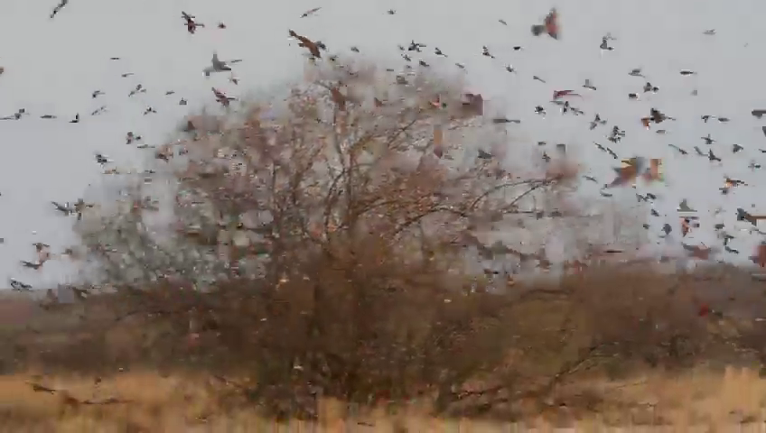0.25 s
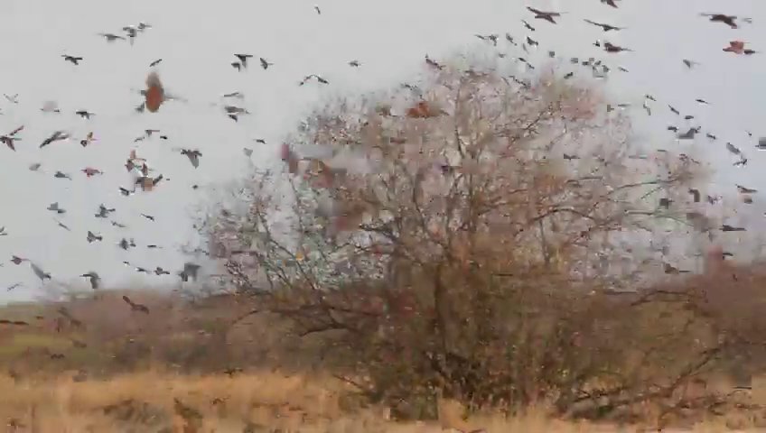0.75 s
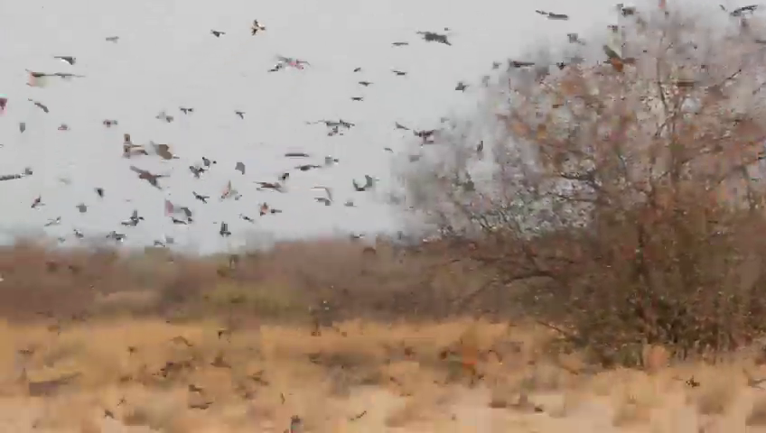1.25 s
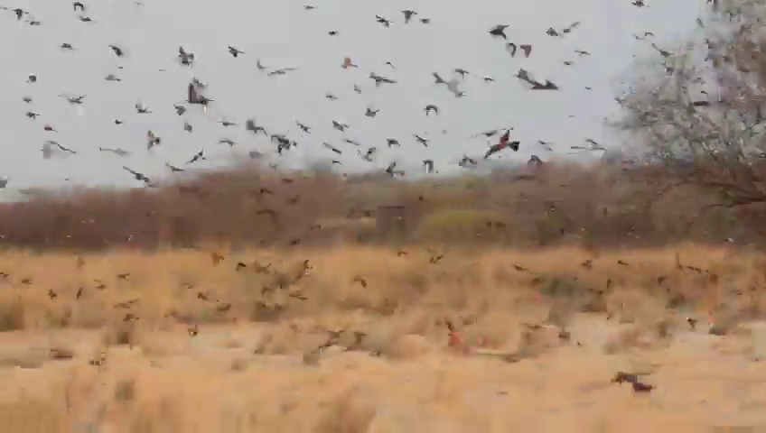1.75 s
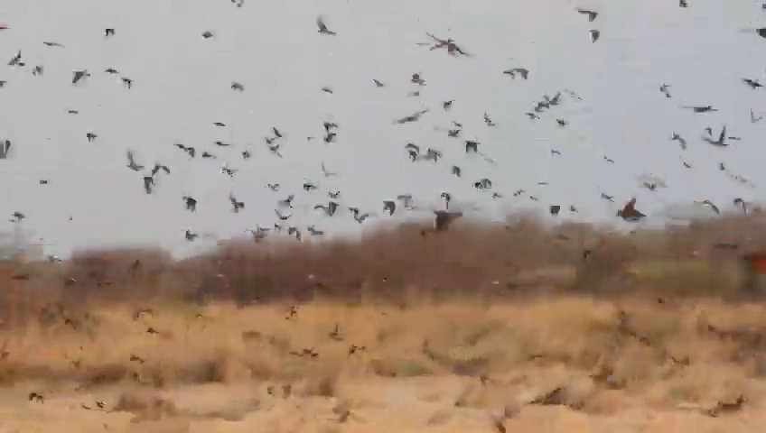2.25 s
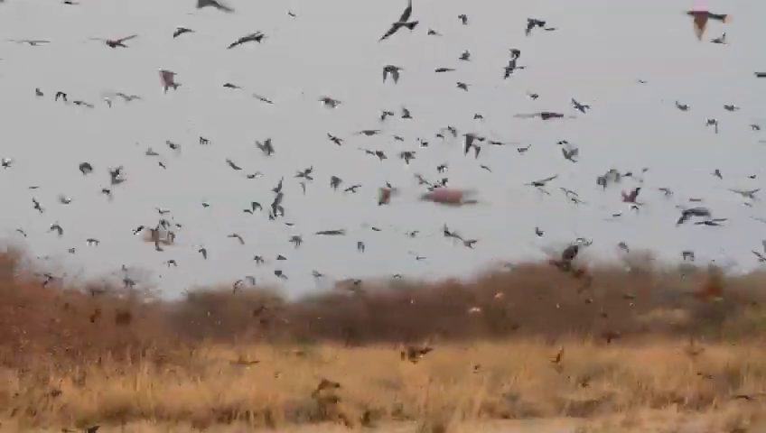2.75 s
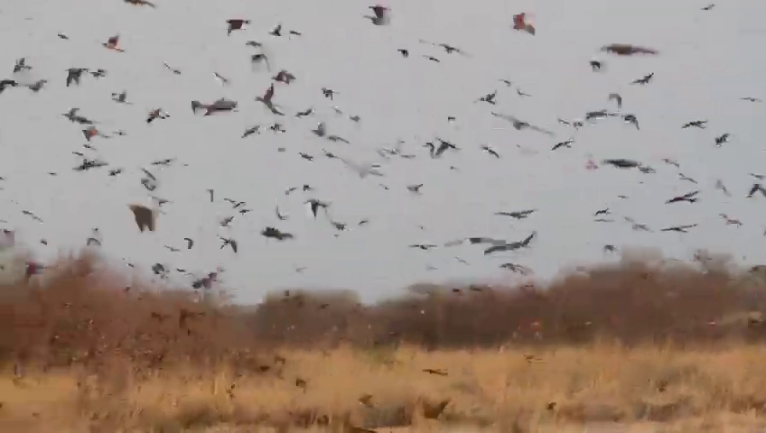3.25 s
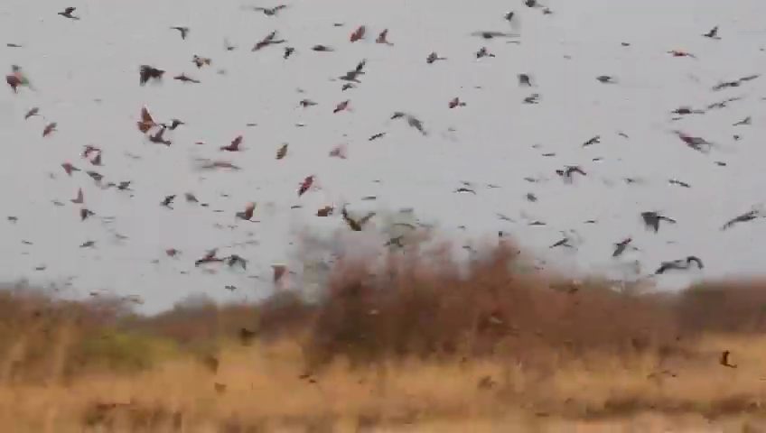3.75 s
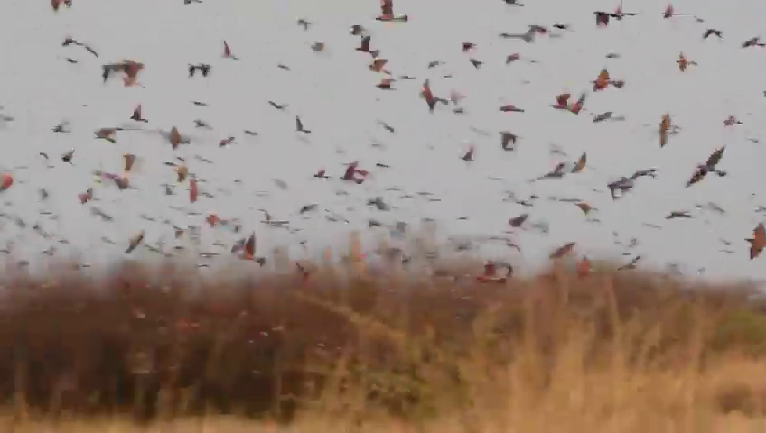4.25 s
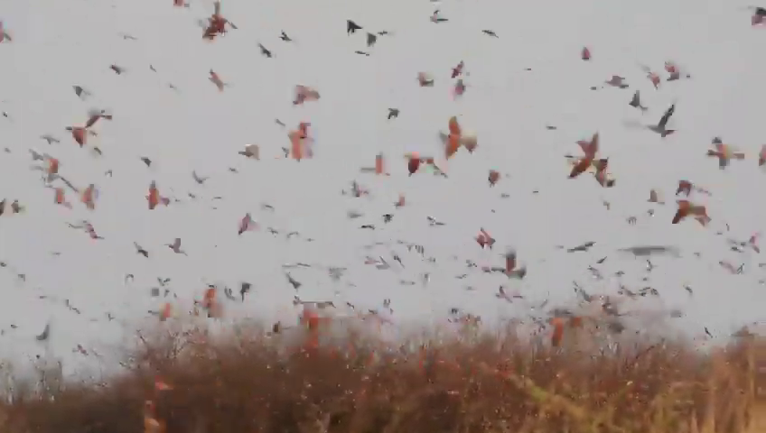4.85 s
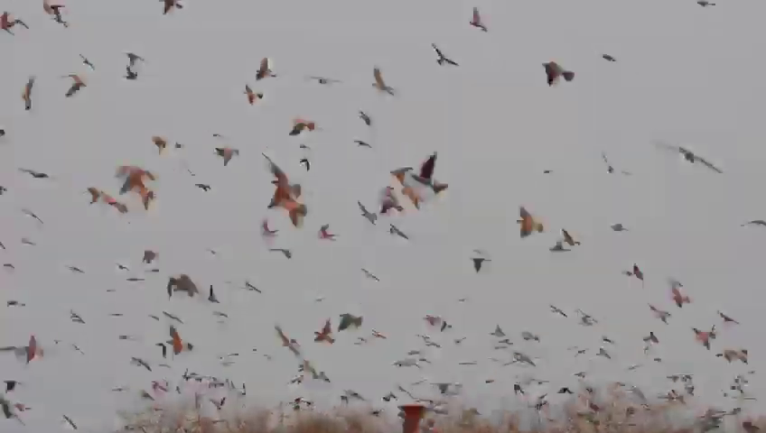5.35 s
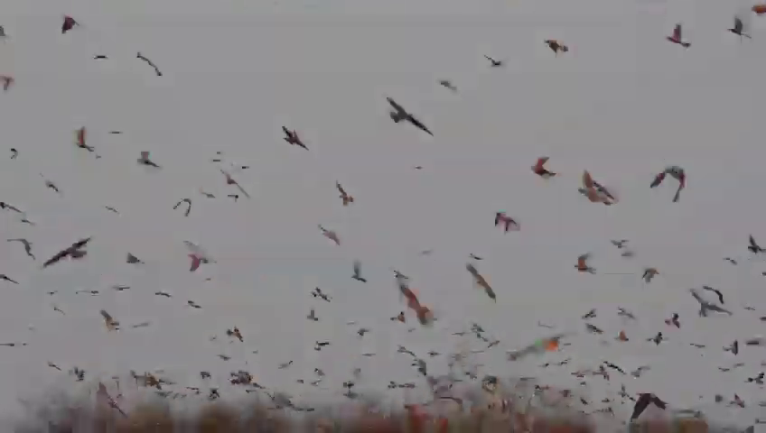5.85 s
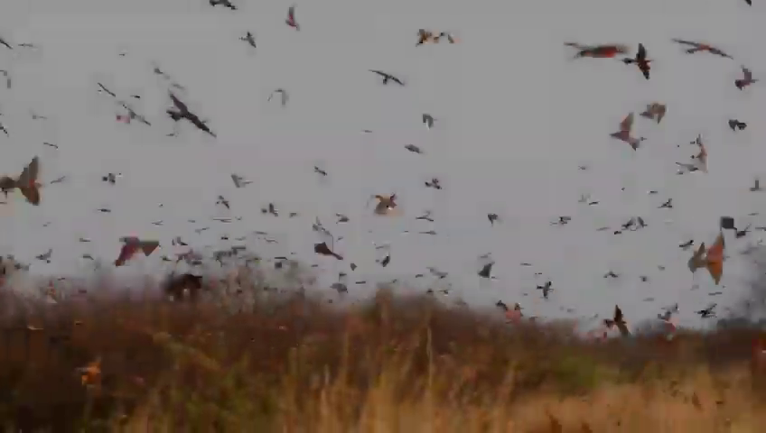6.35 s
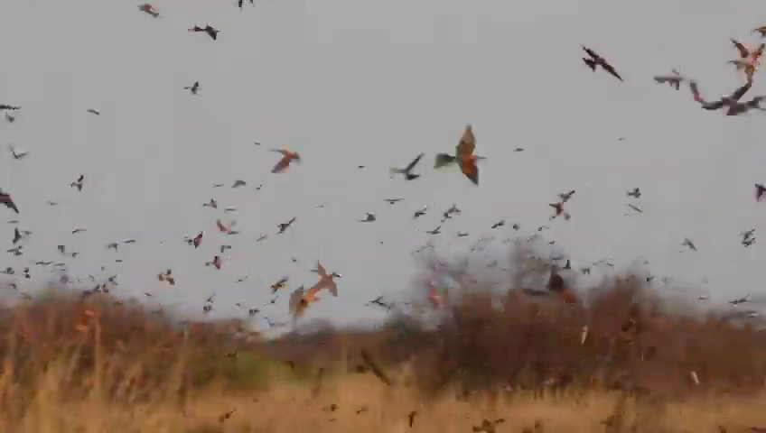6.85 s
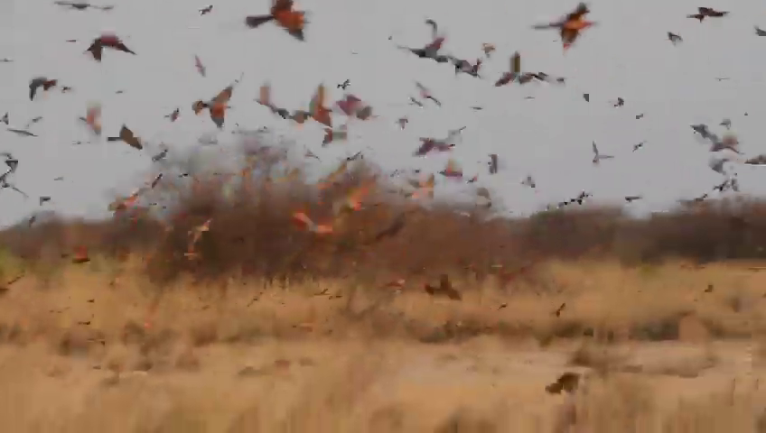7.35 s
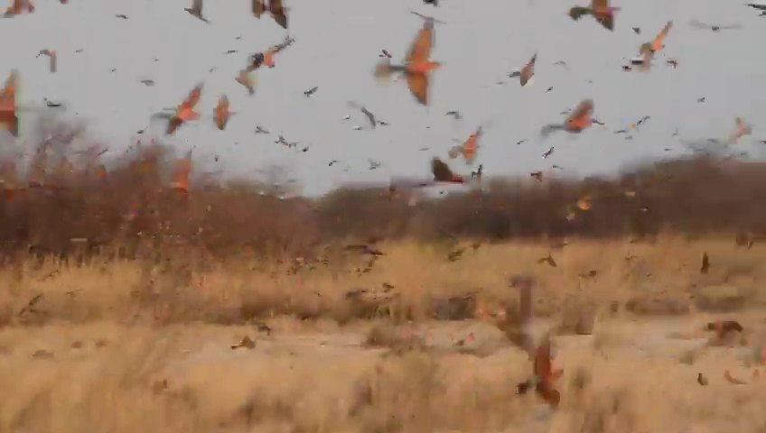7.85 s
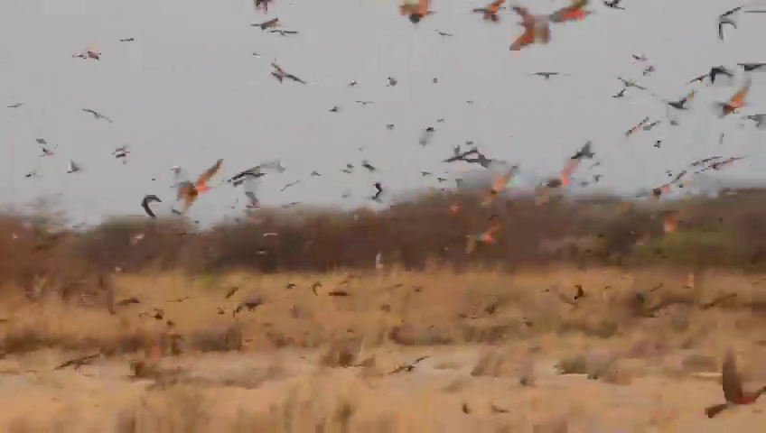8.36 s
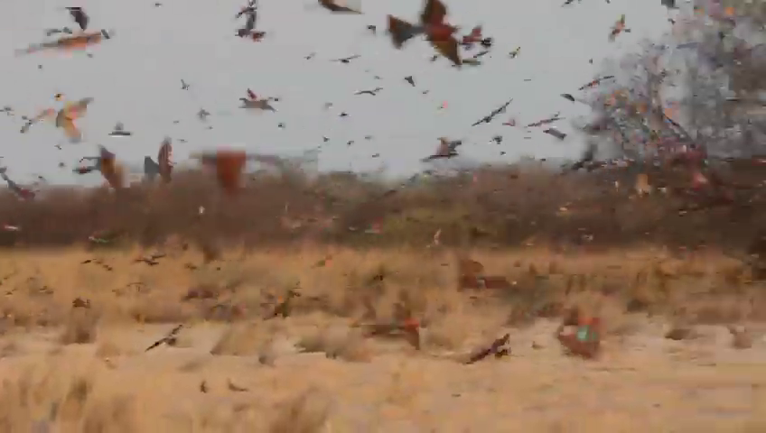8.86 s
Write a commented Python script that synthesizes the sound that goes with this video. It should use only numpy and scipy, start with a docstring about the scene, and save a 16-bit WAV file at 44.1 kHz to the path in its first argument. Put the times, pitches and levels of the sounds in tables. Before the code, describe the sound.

A dense bird chorus fades in quickly and continues to the end: throaty, trilled little croaks overlapping at many distances, with tiny lulls. A faint low engine drone and puttering exhaust lie underneath, the rasp rising again around seven seconds. Light wind bumps the microphone briefly near five to six seconds, and a few brighter, sharper call edges flick out late. Open air, almost no echo, narrow stereo.

```python
"""A colony of bee-eaters wheels over open grassland, all calling at once, for about nine seconds.
The sound fades in on a distant engine (pulses, knocks and puffs), faint air hiss and a light gust.
Near birds croak in short, rolling, falling notes, strongest on the second harmonic; a flock of such
notes and a wash of noise lie behind. Bright call edges, swept sines, come near 3.6 s; soft thuds and a
gust gather from 5 to 6.5 s, the engine's rasp peaks again at 7 s, then more bright edges follow."""
import sys
import numpy as np
from scipy import signal
from scipy.fft import rfft, irfft, next_fast_len
from scipy.io import wavfile
from scipy.ndimage import map_coordinates

SR = 44100
rng = np.random.default_rng(int(sys.argv[2]) if len(sys.argv) > 2 else 0)


def file_out(sig):
    """Save sig as 16-bit WAV at sys.argv[1]."""
    # one column per channel
    cols = np.atleast_2d(sig).T
    # limit, then scale
    lim = np.clip(cols, -1, 1)
    pcm = np.round(lim * 32767).astype(np.int16)
    wavfile.write(sys.argv[1], SR, pcm)


N = 400869
TIME = np.arange(N) / SR


def amp(db):
    """Decibels to gain."""
    return 10 ** (np.asarray(db) / 20)


def unit(x):
    """Scales to rms 1."""
    return x / np.sqrt(np.mean(x ** 2) + 1e-20)


def noise(count):
    """White noise of about rms 1."""
    return rng.standard_normal(count)


def curve(rows):
    """Each column of a table of (seconds, ..) rows, drawn as straight lines at every sample."""
    seconds, *columns = np.transpose(rows)
    return [np.interp(TIME, seconds, column) for column in columns]


def colour(x, points):
    """Filters by a spectrum of (Hz, dB) points, joined along a logarithmic pitch axis."""
    size = next_fast_len(len(x) + 512)
    hz, db = np.transpose(points)
    bins_hz = np.fft.rfftfreq(size, 1 / SR)
    gain = amp(np.interp(np.log(bins_hz + 1), np.log(hz), db))
    return irfft(rfft(x, size) * gain, size)[:len(x)]


def wander(count, hz):
    """Smooth chance of about unit size, with hz random knots a second."""
    own_rng = np.random.default_rng(rng.integers(1 << 30))
    knots = own_rng.standard_normal(int(count * hz / SR) + 3)
    return map_coordinates(knots, [np.arange(count) * hz / SR], order=2, mode="nearest")


def add(mix, start_s, sound):
    """Mixes a sound in at a time."""
    part = mix[max(round(start_s * SR), 0):][:len(sound)]
    part += sound[:len(part)]


def scatter(x, t60):
    """Faint echoes off ground and bushes: sparse taps of random sign, dying by 60 dB in t60 seconds."""
    t = np.arange(SR // 2) / SR
    signs = rng.choice([-1., 1.], len(t))
    present = rng.random(len(t)) < 1 / 20
    taps = signs * present * amp(-60 * t / t60)
    return signal.oaconvolve(x, taps / np.linalg.norm(taps))[:N]


def open_air():
    """Faint hiss of the open air: steady, coloured noise."""
    # Tone of the air. Each row: frequency in Hz, gain in dB.
    air_tone = [(25, -15), (60, 0), (150, 12), (330, 8.5), (1000, 4), (4500, -3), (6500, 1), (8500, -6.5),
                (10800, -35), (12000, -32)]
    return amp(-59.5) * unit(colour(noise(N), air_tone))


def breeze():
    """Wind on one microphone port: a lumpy rumble; each gust swells and dies away."""
    # Tone of the wind. Each row: frequency in Hz, gain in dB.
    rumble_tone = [(20, -12), (45, 4), (75, 9), (120, -2), (250, -29), (600, -39)]
    # Light gusts. Each row: start in seconds, length in seconds, level in dB.
    gusts = [(.1, .8, -66), (4.4, 1, -81), (5.7, 0.27, -66)]
    strength = np.zeros(N)
    for start_s, length_s, db in gusts:
        add(strength, start_s, amp(db) * signal.windows.tukey(int(length_s * SR), .5))
    lumps = amp(2 * wander(N, 14))
    return strength * unit(colour(noise(N), rumble_tone) * lumps)


def port():
    """What one microphone port adds by itself: hiss and wind, unlike those of the other port."""
    # Tone of the port's hiss. Each row: frequency in Hz, gain in dB.
    hiss_tone = [(100, -22), (400, 7), (800, 1), (4500, -51), (6500, 4), (9500, 6.5), (10800, 10),
                 (12000, -4)]
    return amp(-67.5) * unit(colour(noise(N), hiss_tone)) + breeze()


def bumps():
    """Soft thuds of air on the microphone: dull puffs of noise that rise quickly and die away."""
    # Each row: time of the peak in seconds, upper edge of the full band in Hz, peak level in dB.
    thuds = [(0.269, 170, -66), (5.219, 170, -64), (5.885, 152, -55), (6.252, 623, -50)]
    rise_s = 0.024
    out = np.zeros(N)
    t = np.arange(SR // 5) / SR
    swell = t / rise_s * np.exp(1 - t / rise_s)
    for peak_s, hz, db in thuds:
        puff = colour(noise(len(t)), [(hz / 4, -20), (hz / 2, 0), (hz, 0), (2 * hz, -30)])
        add(out, peak_s - rise_s, amp(db) * swell * unit(puff))
    return out


def engine():
    """Distant engine: every firing pushes out a low pulse, a ringing knock and a short puff of exhaust."""
    # Hum, and the drone above it. Each row: multiple of the firing rate, level in dB within the stack.
    hum_orders = [(1, -5), (2, 0), (3, 2), (4, -2.5)]
    drone_orders = [(5, -3.5), (6, 2), (6.5, -4.5), (7, 5), (8, 5)]
    # Tone of the rush around the drone, and of the exhaust. Each row: frequency in Hz, gain in dB.
    rush_tone = [(40, -32), (200, -12), (330, -3), (450, 3), (560, 6), (750, 4), (1200, -79)]
    exhaust_tone = [(40, -50), (250, -29), (430, -39), (600, -3.5), (770, 4), (950, -2), (1200, -4),
                    (2000, -66)]
    # Swells of hum, drone and exhaust rasp. Each row: time in seconds, level in dB before the layer's trim.
    hum_swell = [(.25, -53.5), (2.5, -52.5), (4.6, -54.5), (5.5, -56.5), (9.05, -57.5)]
    drone_swell = [(.25, -51.5), (2.9, -55.5), (4, -63), (5, -57.5), (5.9, -57.5), (7.3, -51.5), (8.3, -62)]
    rasp_swell = [(.25, -51), (2, -43.5), (3.7, -45), (4.6, -55.5), (6.5, -46.5), (7, -40), (7.3, -45),
                  (8.3, -54.5)]
    firing_hz, unsteady = 64.5, 0.00198  # unsteady: share of the rate
    puff_turns = 0.31  # decay of a puff, in firing periods
    knock_share = 0.29  # share of the exhaust's power
    drone_db, rush_db, rasp_db = -5, -4, -2  # trims

    turns = np.cumsum(firing_hz * (1 + unsteady * wander(N, 2))) / SR

    def stack(orders):
        return unit(sum(amp(db) * np.sin(2 * np.pi * (k * turns + rng.random())) for k, db in orders))

    hum, drone = stack(hum_orders), stack(drone_orders)
    gate = np.exp(-(turns % 1) / puff_turns)
    rush = unit(colour(gate * noise(N), rush_tone))
    puffs = unit(colour(gate * noise(N), exhaust_tone))
    # the ring of the knock slips a quarter cycle from one firing to the next
    ring = sum(np.cos(2 * np.pi * (k - 1 / 4) * turns) for k in range(9, 17))
    knocks = unit(colour(ring, exhaust_tone))
    exhaust = unit(np.sqrt(1 - knock_share) * puffs + np.sqrt(knock_share) * knocks)

    [hum_level], [drone_level], [rasp_level] = curve(hum_swell), curve(drone_swell), curve(rasp_swell)
    low = amp(hum_level) * hum
    middle = amp(drone_level) * (amp(drone_db) * drone + amp(rush_db) * rush)
    return low + middle + amp(rasp_level + rasp_db) * exhaust


def wash():
    """Far side of the colony: noise whose low and high harmonics flutter apart as calls pile up."""
    # Blur of the farthest birds. Each row: frequency in Hz, gain in dB.
    blur_tone = [(80, -52), (300, -39), (700, -16.5), (1050, -7.5), (1380, -5), (1650, -5.5), (1950, -3),
                 (2350, 1.5), (2700, -3), (3000, -14.5), (3400, -37), (4100, -69), (4900, -28), (8000, -71)]
    flutter_db = 3.5
    blur = colour(noise(N), blur_tone)
    low = colour(blur, [(1700, 0), (2100, -40)])
    high = blur - low
    return unit(low * amp(flutter_db * wander(N, 40)) + high * amp(flutter_db / 2 * wander(N, 40)))


def croak(length, pitch_hz, fall, edge_db):
    """One note: the pitch arches and falls as a fast roll shakes it, then slides off in a fading tail."""
    # Colour of a bird's voice. Each row: frequency in Hz, gain in dB.
    voice_tone = [(150, -30), (700, -18), (1100, -7), (1400, -7.5), (1800, -4.5), (2300, 3.5), (2750, 3.5),
                  (3130, -2.5), (3450, -10.5), (4050, -19), (4600, -22.5), (5400, -25.5), (6500, -25.5),
                  (7600, -29), (10000, -28.5), (12000, -34.5)]
    timbre_db, swell_db, hoarse_db, sag_db = 2, 7, -17, 1.4
    # pitch movement, as shares of the pitch
    arch, waver, jitter = .055, .018, .02
    roll_hz, roll_depth = 150, .32
    # roughness: of phase and level per harmonic number, of the whole note, of the single harmonics
    grain, rasp, flutter = .09, .19, .25
    attack_s, bend_s, tail_s, tail_fade_db = .0055, .002, .015, 18
    plunge_per_s = rng.uniform(0, 16)  # extra fall in the tail

    count = int((length + tail_s) * SR)
    t = np.arange(count) / SR
    along = np.minimum(t / (length + bend_s), 1)
    hump = 1 / 3 - (2 * along - 1) ** 2
    late_s = bend_s * np.logaddexp(0, (t - length) / bend_s)  # time into the tail, eased in

    # some notes roll hard, others are nearly smooth
    roll_turns = np.cumsum(roll_hz * (1 + .3 * wander(count, 120))) / SR
    roll = rng.uniform(.4, 1.6) * np.sin(2 * np.pi * (rng.random() + roll_turns))
    glide = -fall * (t - length / 2 - bend_s) + arch * hump - plunge_per_s * late_s
    # no two cycles are equally long
    bend = glide + waver * (roll / 2 + wander(count, 273)) + jitter * wander(count, 2182)
    phase = 2 * np.pi * np.cumsum(pitch_hz * np.exp(bend)) / SR

    # each note weights its harmonics its own way, and its edge is brightest in mid-note
    starts = 2 * np.pi * rng.random(9)
    own_db = timbre_db * rng.standard_normal(9)
    bright_db = edge_db + swell_db * hump
    # a forced note turns hoarse: a puff of noise in every cycle
    stack = amp(hoarse_db + bright_db) * (1 + np.cos(phase)) * wander(count, SR / 2)
    for k in range(1, 10):
        # the second harmonic is strong and steady, and outlasts the others in the tail
        weaker = k != 2
        edge_share = min(max(k - 2, 0) / 3, 1)  # none up to the second, full from the fifth
        db = bright_db * edge_share + own_db[k - 1] * weaker
        db = db - weaker * tail_fade_db / 2 * late_s / tail_s
        # the higher the harmonic, the more it dissolves into a rasp
        smear = grain * k * wander(count, 1297)
        shake = unit(1 + grain * k * wander(count, 722) + flutter * weaker * wander(count, 228))
        stack += amp(db) * shake * np.sin(k * phase + starts[k - 1] + smear)

    opening = np.minimum(np.minimum(t, t[-1] - t) / attack_s, 1)
    fade = amp(-sag_db * along - tail_fade_db * late_s / tail_s)
    loudness = (1 + roll_depth * roll + rasp * wander(count, 1004)) * opening * fade
    # the level is set as if the tail were half as long
    tail_share = np.sqrt((length + tail_s / 2) / (length + tail_s))
    return unit(colour(stack * loudness, voice_tone)) * tail_share


def flock():
    """Birds at middle distance, each repeating its own note: some level or rising, most falling."""
    count, notes_per_s = 110, 128
    pitch_hz, pitch_spread, edge_db = 1350, .067, -13
    note_s, drop = .029, .085  # drop: typical fall over one note, as a share of the pitch
    distance_power = 2.9  # dB lost per e-fold of distance
    out = np.zeros(N)
    birds = np.clip(rng.standard_normal((count, 3)), -2, 2)
    voices = []
    for long, high, steep in birds:
        length = note_s * np.exp(.4 * long)
        fall = drop * (1 + steep) / length
        voices.append(croak(length, pitch_hz * np.exp(pitch_spread * high), fall, edge_db))
    for i, (late, who, distance) in enumerate(rng.random((int(notes_per_s * N / SR), 3))):
        gain = amp(-distance_power * np.log(distance + 1 / 20))
        add(out, (i + 3 * late) / notes_per_s, gain * voices[int(who * count)])
    return unit(out)


def chorus():
    """The flock and the wash behind it swell and ease together, with brief lulls between calls."""
    # How busy the birds are. Each row: time in seconds, level in dB before the trims of flock and wash.
    busy = [(0.2, -35.5), (0.35, -30), (0.44, -32.5), (2.12, -30), (2.27, -30.5), (3.77, -32),
            (3.92, -30.5), (4.66, -33), (4.81, -32), (5.5, -30.5), (5.77, -34), (6.09, -33), (8.7, -32.5),
            (9.05, -33)]
    # Lulls, when few birds call. Each row: middle in seconds, depth in dB.
    lulls = [(1.42, -2), (2.37, -4), (2.75, -2.5), (3.92, -5), (4.05, -4), (4.77, -1), (4.92, -2.5),
             (7, -1), (7.19, -3), (7.91, -3.5), (8.39, -4.5), (8.79, -2)]
    flock_db, wash_db, lull_s = 0.4, -6, 0.17
    [busy_db] = curve(busy)
    for middle_s, db in lulls:
        add(busy_db, middle_s - lull_s / 2, db * signal.windows.hann(int(lull_s * SR)))
    return amp(busy_db) * (amp(flock_db) * flock() + amp(wash_db) * wash())


def bright_edges():
    """Bright upper harmonics that stand out from some near calls: rough sines sweeping down ever faster."""
    # Each row: start in seconds, length in seconds, top frequency in Hz,
    # drop as the share of that frequency lost by the end, level in dB.
    edges = [(3.579, 0.021, 4300, 0.3, -46), (3.597, 0.019, 4260, 0.074, -50),
             (3.704, 0.025, 4100, 0.13, -51), (7.694, 0.018, 4460, 0.3, -50),
             (7.711, 0.02, 4260, 0.35, -47.5), (8.389, 0.053, 4100, 0.36, -48),
             (8.816, 0.024, 4170, .22, -38.5), (8.832, 0.028, 5100, 0.36, -45)]
    waver, rasp = .018, .3  # shares of frequency and of level
    out = np.zeros(N)
    for start_s, length_s, top_hz, drop, db in edges:
        along = np.linspace(0, 1, int(length_s * SR))
        count = len(along)
        sweep_hz = top_hz * (1 - drop * along ** 2 + waver * wander(count, 590))
        tone = np.sin(2 * np.pi * np.cumsum(sweep_hz) / SR)
        rough = tone * (1 + rasp * wander(count, 1470))
        add(out, start_s, amp(db) * unit(rough * signal.windows.tukey(count, .5)))
    return out


def near_birds():
    """The birds that pass closest: each call is one croak or a quick run of croaks stepping down."""
    # Each row: start in seconds, length in seconds, number of notes, pitch in Hz,
    # fall as the share of the pitch lost per second, level in dB, edge on the upper harmonics in dB.
    calls = [(0.125, 0.054, 2, 1416, 1.6, -43.5, -34), (0.204, 0.017, 1, 1382, 4.8, -32.5, -16),
             (0.38, 0.01, 1, 1434, 8.6, -27.5, -14), (.393, 0.033, 1, 1347, 6.5, -28, -14),
             (0.468, 0.058, 2, 1423, 5.1, -28, -11), (.63, 0.032, 1, 1348, 5.5, -40, -11),
             (0.777, 0.072, 2, 1390, 2.5, -30.5, -13), (0.863, 0.034, 1, 1493, 2, -25.5, -17),
             (0.905, 0.057, 2, 1443, 5, -25, -13), (0.975, 0.026, 1, 1378, 5.6, -28, -9),
             (1.176, 0.032, 1, 1408, 1.3, -26.5, -20), (1.217, 0.013, 1, 1350, 9.5, -26, -12),
             (1.24, 0.021, 1, 1380, 3.5, -28, -5), (1.336, 0.021, 1, 1470, 10.4, -25.5, -10),
             (1.358, .015, 1, 1327, 9, -24.5, -14), (1.456, 0.028, 1, 1312, 7.8, -30.5, -18),
             (1.513, .01, 1, 1404, 2.3, -23.5, -11), (1.537, 0.012, 1, 1375, 5.4, -22, -11),
             (1.643, .03, 1, 1209, 12, -32.5, -8), (1.681, 0.036, 1, 1300, 3.6, -32.5, -24),
             (1.819, 0.026, 1, 1370, 3.6, -27.5, -25), (1.875, 0.0097, 1, 1426, 3.3, -24.5, -6),
             (1.896, 0.023, 1, 1345, 5.2, -22.5, -7), (1.97, 0.048, 2, 1447, 2.9, -26.5, -16),
             (2.032, 0.021, 1, 1447, 8.1, -23, -15), (2.049, 0.021, 1, 1517, 4.5, -25.5, -16),
             (2.064, .022, 1, 1040, 5.3, -42, -20), (2.243, 0.042, 1, 1270, 4.3, -30.5, -12),
             (2.323, 0.031, 1, 1406, 4.3, -28, -13), (2.452, 0.014, 1, 1493, 3.3, -21.5, -11),
             (2.466, 0.0147, 1, 1338, 3.7, -18, -7), (2.478, .014, 1, 1495, 1.8, -26, 2),
             (2.484, .036, 1, 1303, 3.6, -17.5, -4), (2.536, .012, 1, 1204, 5, -39, -24),
             (2.616, 0.039, 2, 1300, 3.5, -26, -14), (2.81, 0.021, 1, 1266, 7.3, -23.5, -3.5),
             (2.832, 0.0263, 1, 1237, 5, -27, 1), (2.895, 0.048, 1, 1333, 4, -30, -4),
             (2.988, 0.065, 2, 1311, 9.4, -28, -8), (3.06, .022, 1, 1355, 5, -26.5, -22),
             (3.088, 0.0086, 1, 1326, 3.8, -24, -14), (3.108, 0.025, 1, 1315, 4.9, -24, -15),
             (3.406, 0.027, 1, 1330, 2.3, -29.5, -40), (3.459, 0.05, 2, 1317, 3.5, -26, -11),
             (3.614, 0.012, 1, 1226, 11.4, -29, -12), (3.634, 0.02, 1, 1452, 4.3, -29, -27),
             (3.698, 0.022, 1, 1300, 3.2, -28, -30), (3.755, 0.048, 1, 1276, 3.53, -29.5, -34),
             (3.797, 0.052, 2, 1296, 5.2, -27, -19), (3.975, 0.042, 1, 1363, 4.3, -33, -45),
             (4.211, 0.056, 1, 1403, 2.4, -31.5, -14), (4.383, .03, 1, 1306, 9, -33.5, -33),
             (4.595, 0.04, 1, 1280, 5.9, -26.5, -26), (4.64, 0.038, 2, 1460, 3.2, -31.5, -6.5),
             (4.709, 0.036, 1, 1260, 5.5, -32.5, -25), (4.807, 0.024, 1, 1366, 6.3, -30.5, -35),
             (4.965, .03, 1, 1355, 4.4, -30, -22), (5.024, 0.039, 1, 1352, 4.4, -26.5, -11),
             (5.112, 0.03, 1, 1332, 2.8, -26.5, -38), (5.175, 0.02, 1, 1336, 6.2, -34, -22),
             (5.253, 0.025, 1, 1363, 12.5, -36, -22), (5.341, 0.031, 2, 1302, 7.1, -29, -11),
             (5.464, 0.062, 2, 1343, 4.9, -30, -22), (5.56, 0.032, 1, 1350, 6.2, -38, -22),
             (5.651, 0.029, 1, 1454, 4.2, -25, -11), (5.889, 0.038, 1, 1320, 3.1, -31, -32),
             (5.981, .035, 1, 1346, 4.5, -38, -16), (6.1, 0.012, 1, 1240, 18, -37, -25),
             (6.166, 0.045, 1, 1330, 1.35, -29.5, -45), (6.315, 0.044, 1, 1376, 5.7, -31.5, -10),
             (6.449, 0.027, 1, 1300, 9.3, -40, -22), (6.656, 0.015, 1, 1444, 7.5, -30, -10),
             (6.682, 0.025, 1, 1336, 9.2, -33, -16), (6.793, 0.022, 1, 1298, 5.2, -30.5, -19),
             (6.859, 0.036, 1, 1350, 5.4, -30.5, -20), (6.917, 0.05, 1, 1347, 2.2, -34, -8),
             (7.093, 0.049, 1, 1357, 6.2, -28, -13), (7.262, 0.034, 1, 1347, 8.4, -33.5, -12),
             (7.345, 0.024, 1, 1487, 7.1, -31, -23), (7.393, 0.033, 1, 1260, 4.1, -32.5, -19),
             (7.557, 0.045, 2, 1386, 1.9, -25.5, -19), (7.659, 0.049, 2, 1370, 5.4, -32.5, -21),
             (7.711, 0.046, 1, 1337, 4, -33, -12), (7.797, .06, 2, 1355, 2.4, -43, -24),
             (7.965, 0.06, 2, 1343, 6.5, -28, -10), (8.056, 0.042, 1, 1324, 3.6, -31, -20),
             (8.15, 0.089, 4, 1430, 8.5, -35.5, -4.5), (8.256, 0.049, 1, 1316, 2.96, -27.5, -14),
             (8.336, .014, 1, 1360, 5.5, -30.5, -27), (8.404, 0.03, 1, 1450, 3.1, -38, -2),
             (8.555, 0.024, 1, 1337, 6.7, -31.5, -29), (8.64, 0.037, 1, 1344, 3.3, -33, -26),
             (8.819, .016, 1, 1386, 2.2, -38, 8), (8.843, 0.031, 2, 1490, 7.2, -31, -8),
             (8.878, .034, 1, 1436, 4.7, -31.5, -24), (8.93, 0.035, 1, 1300, 4.5, -35, -20)]
    # from first note to last: drop as a share of the pitch, and change of level in dB
    step_down, grow_db = 0.0528, -0.5
    lengthen, pause_s = 1.3, 0.0077  # above 1, later notes are longer
    out = np.zeros(N)
    for start_s, length, notes, pitch_hz, fall, db, edge_db in calls:
        bounds = start_s + length * np.linspace(0, 1, notes + 1) ** lengthen
        for k in range(notes):
            place = (k - (notes - 1) / 2) / max(notes - 1, 1)  # -1/2 to 1/2 along the run
            note_hz = pitch_hz * (1 - step_down * place)
            pause = pause_s * (k < notes - 1)
            note_s = max(bounds[k + 1] - bounds[k] - pause, .008)
            note = croak(note_s, note_hz, fall, edge_db)
            add(out, bounds[k], amp(db + grow_db * place) * note)
    return out


def scene():
    """Birds, engine and air, as in the open: nearly mono, with scattered sound as the side signal."""
    # Width of the scene. Each row: frequency in Hz, level of side against mid in dB.
    width = [(30, -15), (60, -20), (200, -25), (700, -29), (1400, -26), (2700, -19), (3600, -19),
             (6000, -17), (9500, -9), (12000, -12)]
    near = near_birds() + bright_edges()
    echo = amp(-15) * scatter(near, t60=.16)
    mid = open_air() + bumps() + engine() + chorus() + echo + near
    side = colour(scatter(mid, t60=.07), width)
    return np.array([mid + side + port(), mid - side + port()])


def record(dry):
    """The sound fades in over 0.2 s, and a steep low-pass cuts the top of the treble."""
    edge_hz = 12200
    [fade_db] = curve([(0, -11.5), (.1, -6.5), (.2, -1)])
    low_pass = signal.firwin(511, edge_hz, window=("kaiser", 9), fs=SR)
    return signal.oaconvolve(dry * amp(fade_db), low_pass[None], "same")


dry = scene()
out = record(dry)
file_out(out)
```